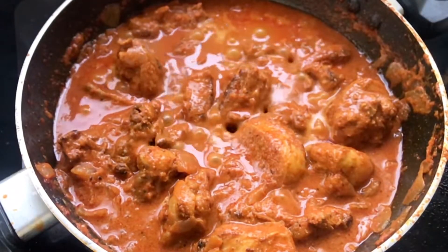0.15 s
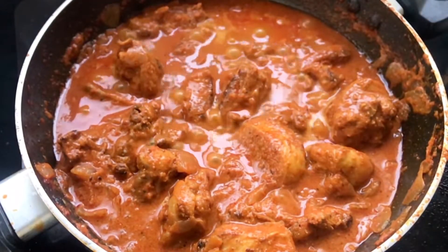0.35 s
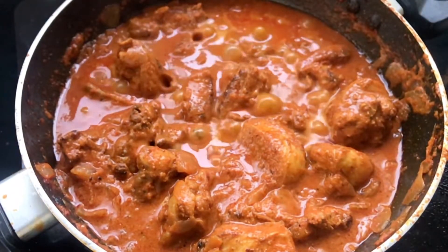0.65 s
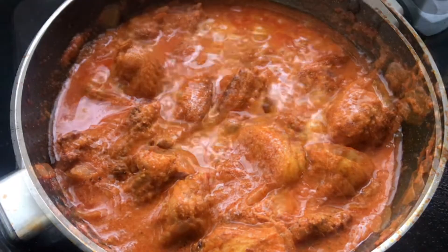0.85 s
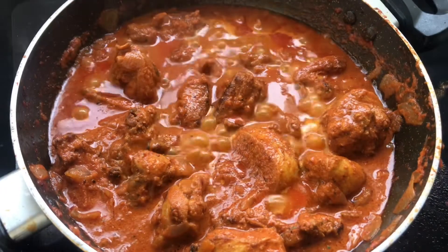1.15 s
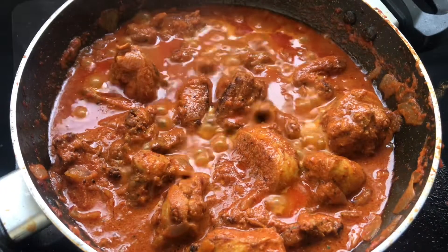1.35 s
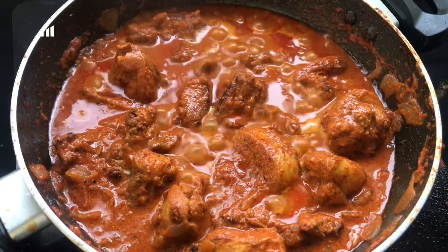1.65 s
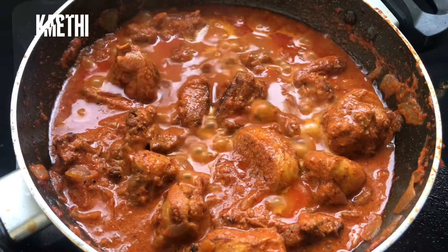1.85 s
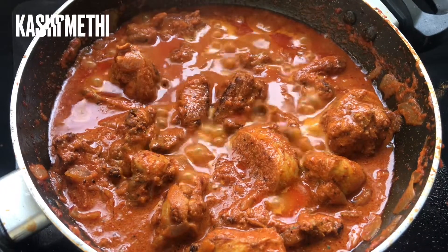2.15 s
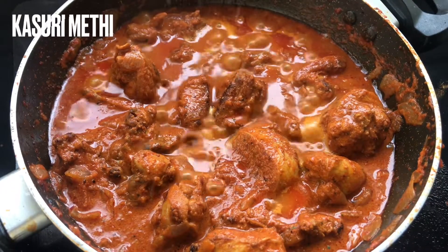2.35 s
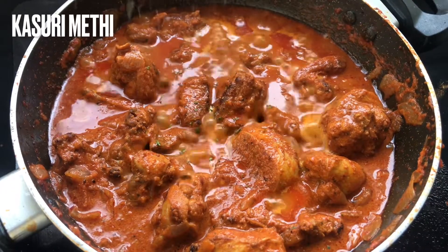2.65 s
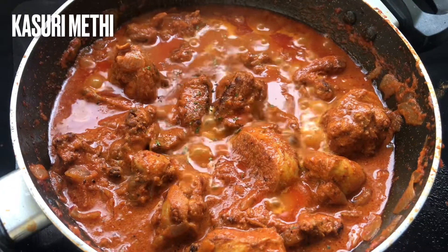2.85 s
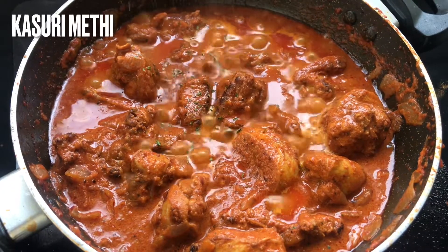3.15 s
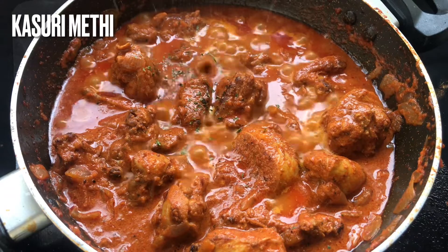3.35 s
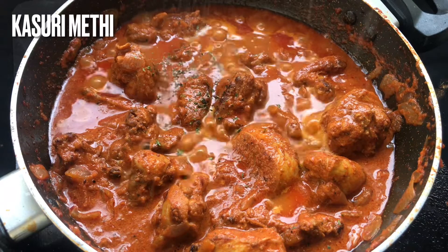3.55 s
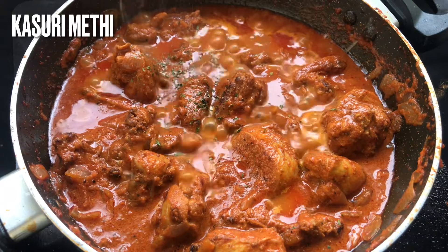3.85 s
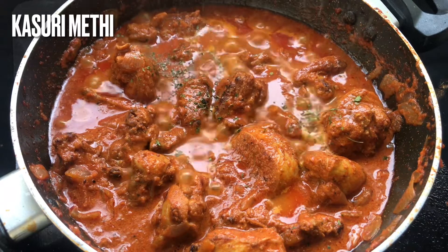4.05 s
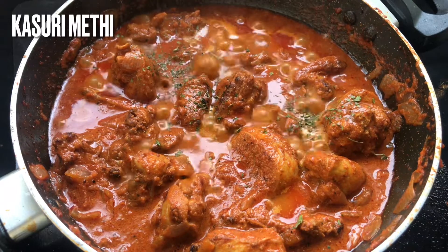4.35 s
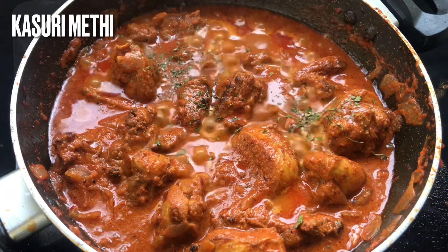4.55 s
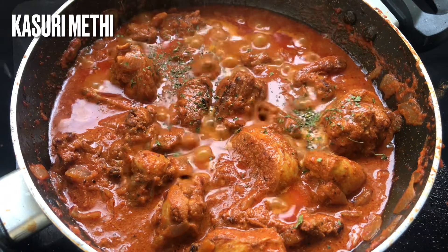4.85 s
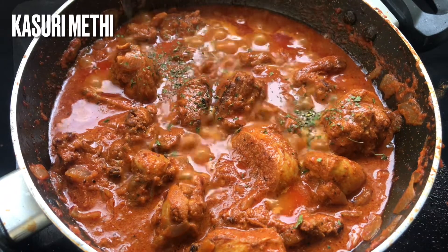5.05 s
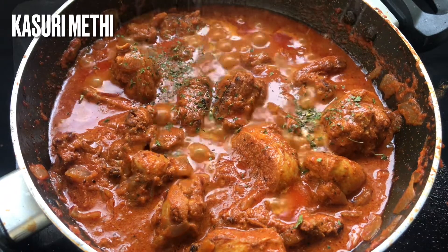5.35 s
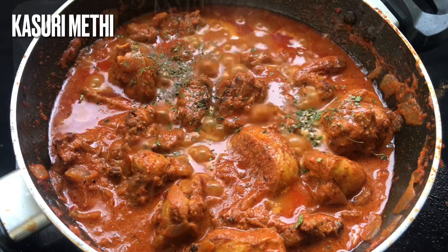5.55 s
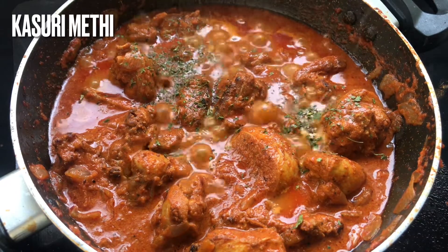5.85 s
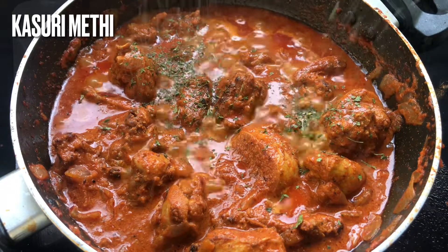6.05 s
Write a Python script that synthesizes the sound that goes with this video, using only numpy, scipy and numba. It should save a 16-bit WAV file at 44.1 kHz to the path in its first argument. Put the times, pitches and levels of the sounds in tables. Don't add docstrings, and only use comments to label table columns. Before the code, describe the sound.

Silence holds until about 0.6 s, then a small hard kitchen fades in, full by about 1.15 s. An extractor fan rushes softly with a steady low-mid singing tone above mains hum; a far engine idles unevenly through the walls. Very close, thick gravy simmers in a steel pan: bubbles thump, spit and spray in brief clusters of tiny wet clicks, with short rising plops, quiet gurgling and fine fizz. Each burst rings the pan and draws a short room reflection. A notably sharp snap cracks at 3.2 s, and others cluster near 4.77 s. The hob's faint, very high buzzing whine swells from 2.45 to 3.5 s, briefly from 4.7 to 5.1 s, and again from 5.4 s to the end. The engine drones lower around 3.5 to 3.8 s and barks hardest near 4 s. Simmering continues irregularly to the end, past 6 s.

```python
import sys
import numpy as np
from scipy import signal
from scipy.fft import rfft, irfft
from scipy.io import wavfile
from scipy.ndimage import uniform_filter1d
from numba import njit

SR = 44100
rng = np.random.default_rng(int(sys.argv[2]) if len(sys.argv) > 2 else 0)


def store_wav(level_fs):
    pcm = np.round(np.clip(np.atleast_2d(level_fs), -1, 1) * 32767)
    wavfile.write(sys.argv[1], SR, pcm.T.astype(np.int16))


def volts_from_decibels(level):
    exponent = np.asarray(level, float) / 20
    return 10 ** exponent


N = 272662


def level(x, db):
    return x * volts_from_decibels(db) / np.sqrt(np.mean(x ** 2))


def curve(table):
    s, *columns = np.transpose(table)
    return [np.interp(np.arange(N) / SR, s, c) for c in columns]


def band(x, hz, width):
    return signal.lfilter(*signal.iirpeak(hz, hz / width, fs=SR), x)


def walk(rate):
    hold = int(SR / rate)
    steps = np.repeat(rng.standard_normal(N // hold + 1), hold)
    return 0.74 * uniform_filter1d(uniform_filter1d(steps, hold), hold)[:N]


@njit
def grains(n, start, hz, cycles, size, glide):
    out = np.zeros(n)
    for g in range(len(start)):
        step = 2 * np.pi * hz[g]
        decay = np.exp(-hz[g] / cycles[g])
        a, closed, phase = size[g], 1., 0.
        for i in range(start[g], min(n, start[g] + int(6 * cycles[g] / hz[g]))):
            out[i] += a * (1 - closed) * np.sin(phase)
            phase += step
            step *= 1 + glide * hz[g] / cycles[g]
            a *= decay
            closed *= decay ** 4
    return out


def clicks(s, hz, cycles, db, glide=0.035):
    hz = np.clip(hz, 200, 15000)
    s, hz, cycles, db = (np.ravel(v) for v in np.broadcast_arrays(s, hz, cycles, db))
    return grains(N, (s * SR).astype(np.int64), hz / SR, 1. * cycles, volts_from_decibels(db), glide)


# (time [s], peak level [dB], fine spray level [dB])
BIG_THUMPS = [(0.957, -45.5, -15), (1.0418, -42.5, -27), (1.127, -51, -17), (1.2525, -45, -27),
              (1.356, -41, -15), (1.4642, -41.5, -14.5), (1.5564, -38, -18), (2.1175, -50, -15),
              (2.2247, -45, -13), (2.318, -42, -15), (2.4116, -49, -9.5), (2.497, -48, -8),
              (2.5333, -42.5, -19), (2.6085, -45, -26), (2.7795, -42, -13), (2.878, -51.5, -5),
              (2.9595, -46, -13), (3.379, -48, -14), (3.5, -45, -8.5), (3.6336, -47, -17),
              (3.7129, -45.5, -15), (3.9997, -46, -9.5), (4.0724, -42, -20), (4.1645, -43, -17.5),
              (4.349, -44, -17), (4.4325, -44, -21), (4.669, -40.5, -14.5), (4.7644, -37, -18.5),
              (5.1135, -42.5, -13), (5.7069, -47.5, -23)]
# (time [s], peak level [dB], fine spray level [dB], skin snap pitch [Hz])
TIGHT_SPITS = [(.8627, -48.5, -18, 5170), (.9822, -41, -20, 3750), (1.003, -59, -24, 4310),
               (1.5354, -56, -11, 4180), (1.623, -51, -15, 4440), (1.854, -41, -17, 3790),
               (1.8596, -45.5, -18, 3920), (1.937, -41.5, -17.5, 4030), (2.244, -41.5, -34, 3620),
               (2.3477, -38, -19.5, 3887), (2.6952, -48.5, -13, 5780), (2.8263, -43.5, -16, 3790),
               (3.0479, -46.5, -16, 8100), (3.1915, -45, -11, 5480), (3.2568, -47, -11, 4400),
               (3.5228, -54, -15, 11670), (3.5762, -51, -15, 5770), (3.593, -44.5, -25, 4305),
               (3.7906, -45.5, -12, 6000), (3.8951, -44, -14, 5550), (4.3862, -46.5, -12, 3980),
               (4.9364, -47.5, -11, 6070), (5.0059, -53, -21, 4090), (5.0307, -45.5, -19, 5770),
               (5.1756, -46, -18, 4110), (5.189, -46, -20, 3960), (5.2045, -43, -20, 6426),
               (5.3016, -38.5, -14.5, 7020), (5.4654, -46.5, -19, 5560), (6.091, -40.5, -18, 7630)]
# (time [s], peak level [dB], fine spray level [dB])
SOFT_SPRAYS = [(.688, -58, -21), (.785, -55.5, -16), (1.1834, -57.5, -4), (1.6407, -48, -18),
               (1.7209, -61, -16), (1.744, -50, -10), (2.0586, -48, -26), (2.2046, -56, -10),
               (2.4462, -56, -16), (2.4667, -53, -16), (3.1635, -47, -9), (3.472, -60, -4),
               (3.8595, -55, -32), (4.1353, -52, -30), (4.332, -49, -20), (4.4871, -50, -22),
               (4.514, -47, -19), (4.5709, -46, -19), (4.5855, -47.5, -22), (4.6434, -51, -17),
               (4.8622, -47, -18), (5.2804, -44, -22), (5.57, -54, -5.5), (5.614, -56, -9),
               (5.6766, -51, -12.5), (5.7885, -52, -9), (5.9098, -48.5, -12), (6.01, -52, -17),
               (6.056, -48, -13), (6.1517, -52, -14)]
SPRAY_LENGTHS = (.019, .015, .016)


def bursts(count=90):
    kinds = [np.array(k)[:, :3] for k in (BIG_THUMPS, TIGHT_SPITS, SOFT_SPRAYS)]
    s, db, fine_db = (c[:, None] for c in np.vstack(kinds).T)
    per_kind = (-4, -20, -10), (-4, -6, -5.5), SPRAY_LENGTHS
    sizes = [len(k) for k in kinds]
    ring_db, coarse_db, spray_s = (np.repeat(v, sizes)[:, None] for v in per_kind)
    chance = rng.random((len(s), 3, count))
    late, tune, size = chance[:, 0], chance[:, 1], chance[:, 2]
    blow_hz = PAN_MODES[0][0] * (1 + 0.11 * (tune[:, :1] - .5))
    blow = clicks(s, blow_hz, 10.3, db + ring_db + .1)
    small = (np.arange(count) + tune) / count
    late = 1.0 * late ** 1.6 + .95 * small - .55
    drop_hz = 1500 * 2 ** (3.35 * small)
    bright = np.clip(np.log2(drop_hz / 4000) / 1.36, 0, 1)
    spray_db = -45.0 + 0.75 * (db + 44.5) + 15.0 * np.minimum(late, 0)
    drop_db = spray_db + (1 - bright) * (coarse_db + 0.084) + bright * (fine_db + 11.5)
    drop_db = drop_db + 13.2 * (size ** 2.6 - .85) - 4.3 * size ** 3
    return blow + clicks(s + spray_s * late, drop_hz, 2.95 + 8.7 * size ** 3, drop_db, glide=0.031)


# (time [s], level [dB], pitch [Hz])
LONE_SNAPS = [(1.4675, -43, 6120), (2.539, -40, 3496), (2.7948, -51, 8486), (2.8895, -54, 3000),
              (3.1929, -31.5, 5500), (3.1959, -47, 5940), (3.4949, -44, 4040), (3.5804, -47, 7840),
              (3.934, -49, 4250), (4.0816, -42, 3014), (4.421, -49, 2840), (4.4425, -46, 3140),
              (4.7675, -43, 3296), (4.7685, -39, 5200), (3.1931, -42, 10510), (2.245, -50, 9500),
              (2.187, -54, 7500), (4.7696, -41, 8180), (4.853, -41, 2970), (4.9732, -44.5, 3620),
              (5.7098, -46, 6240)]


def snaps():
    lag_s = .002
    spits = [(s + lag_s, db + 1.5, hz) for s, db, _, hz in TIGHT_SPITS]
    thumps = [(s + lag_s, db - 10, 3290) for s, db, _ in BIG_THUMPS]
    s, db, hz = np.transpose(list(LONE_SNAPS) + spits + thumps)
    ring = clicks(s, hz, 1.94, db + 3.5)
    tick = clicks(s, 1.57 * hz, 1.0, db - 5.0)
    return ring + tick


# (time [s], peak level [dB], pitch [Hz])
SLOW_PLOPS = [(0.81, -51, 2240), (0.935, -54, 2310), (1.024, -40, 596), (1.165, -44, 2150),
              (1.191, -38, 804), (1.342, -52, 2020), (1.463, -50, 2580), (1.551, -48, 2580),
              (1.85, -47, 1880), (2.315, -40, 1670), (2.348, -52, 2232), (2.518, -40, 1410),
              (2.611, -42, 1470), (2.776, -53, 2580), (2.876, -49, 2527), (2.876, -44, 1676),
              (3.525, -49, 2200), (3.711, -40, 1340), (3.808, -48, 2380), (4.079, -37, 794),
              (4.082, -37, 1366), (4.535, -45, 1866), (4.764, -41.5, 1476), (4.835, -48, 2140),
              (4.876, -49, 1880), (5.002, -41.5, 1620), (5.204, -38, 788), (5.206, -45, 1780),
              (5.625, -37.5, 1294), (6.114, -52, 2465)]


def plops(ring_s=0.0041):
    s, db, hz = np.transpose(SLOW_PLOPS)
    return clicks(s, .97 * hz, ring_s * hz, db + 5.0, glide=0.044)


def gurgle(count=300):
    when, tune, size = rng.random((count, 3)).T
    hz = 600 * 2 ** (1.8 * tune)
    db = -47.0 - 5.8 * np.log2(hz / 1000) - 2.9 * np.log(1 - .95 * size)
    return clicks(when * N / SR, hz, .005 * hz, db, glide=0.059)


def fizz(count=4000):
    when, tune, size, ring = rng.random((count, 4)).T
    hz = 700 * 2 ** (4.3 * tune)
    db = -57.0 - 4.9 * np.log2(hz / 2000) - 4.5 * ring - 3.4 * np.log(1 - .98 * size)
    return clicks(when * N / SR, hz, 0.67 + 6.0 * ring, db)


# (frequency [Hz], width [Hz], level [dB])
PAN_MODES = [
    (2840, 38, -1),
    (4130, 250, -29),
    (5680, 470, -12),
    (6440, 530, -13),
    (8270, 40, 13),
    (8660, 350, -10),
    (11250, 110, -10),
]
# (delay [s], level [dB])
WALL_ECHOES = [
    (.0008, -16.5),
    (.0013, -16.5),
    (.0029, -7),
]


def pan(x):
    x = x + sum(volts_from_decibels(db) * np.pad(x, (int(s * SR), 0))[:N] for s, db in WALL_ECHOES)
    modes = sum(volts_from_decibels(0.19 * db) * band(x, hz, 2.9 * width) for hz, width, db in PAN_MODES)
    return x + volts_from_decibels(-3.0) * modes


def room(x, count=3):
    t60_s, lag_s = .28, .010
    t = np.arange(SR // 2) / SR
    spot = np.cumsum(rng.random(N // 2000 + 1)).repeat(2000)[:N] * np.pi
    out = x
    for k in range(count):
        noise = rng.standard_normal(len(t))
        low = signal.lfilter([.5], [1, -.5], noise)
        tail = low * volts_from_decibels(-60 * t / t60_s)
        tail += 1.6 * (noise - low) * volts_from_decibels(-60 * t / (.8 * t60_s))
        tail *= np.clip(t / lag_s, 0, 1) ** 3
        tail /= np.sqrt(np.sum(tail ** 2))
        share = uniform_filter1d(np.cos(spot + k * np.pi / count), 100) * np.sqrt(2 / count)
        out = out + volts_from_decibels(-5) * signal.fftconvolve(x * share, tail)[:N]
    return out


# (frequency [Hz], density [dB per Hz])
FAN_RUSH = [(25, -11), (60, -1), (100, 0.5), (170, -4), (320, -2.5), (520, -3), (980, -3.5), (1500, -8.5),
            (2000, -16.5), (3300, -23), (6300, -29.5), (9500, -34.5), (12500, -35), (15800, -30)]
# (frequency [Hz], width [Hz], boost [dB])
ROOM_MODES = [(215, 30, 2.5), (275, 15, 1.5), (561, 20, 2), (605, 38, 0), (700, 50, 0.5), (900, 11.4, 7),
              (977, 36, 4.5), (1121, 25, 3), (1200, 36, 1.5), (1166, 37, 1.5), (1410, 120, 2.5),
              (1620, 46, 2.0), (1700, 25, 2.5), (1765, 25, 7.5), (1900, 21, 3.5), (2570, 35, 6.5)]


def rush():
    hz = np.arange(N // 2 + 1) * SR / N + 1e-3
    octave = np.log2(hz)
    rush_hz, rush_db = np.transpose(FAN_RUSH)
    air = rfft(rng.standard_normal(N)) * volts_from_decibels(np.interp(octave, np.log2(rush_hz), rush_db))
    air *= np.clip(hz / 25, 0, 1) ** 2
    air *= 1 + sum((volts_from_decibels(db) - 1) / (1 + (2 * (hz - f) / width) ** 2) for f, width, db in ROOM_MODES)
    flow = 0
    for centre in range(3, 16):
        part = irfft(air * np.clip(1 - abs(octave - centre), 0, 1), N)
        flow = flow + part * volts_from_decibels(0.97 * walk(2.97) + 1.43 * walk(15))
    return level(flow, -43)


# (frequency [Hz], level [dB], wobble [dB])
STEADY_TONES = [
    (386.8, -42.5, 1.5),
    (99.85, -48, 1.5),
    (481.7, -63, 4),
]


def tones():
    t = np.arange(N) / SR
    drift = np.cumsum(0.24 * walk(1.49)) / SR
    return sum(np.sqrt(2) * volts_from_decibels(db + wobble_db * walk(6)) * np.sin(2 * np.pi * (hz * t + drift * hz / 387))
               for hz, db, wobble_db in STEADY_TONES)


# (frequency [Hz], level [dB])
COIL_PARTIALS = [
    (14080, -5),
    (14220, -5),
    (14330, 2),
    (14460, -1),
    (14590, -1.5),
    (14800, -11),
    (13930, -7),
]
# (start [s], cut [s], rise [dB])
POWER_SURGES = [
    (2.45, 3.5, 3),
    (4.7, 5.1, 2),
    (5.399, 6.3, 3),
]


def whine():
    t = np.arange(N) / SR
    mains = np.cos(2 * np.pi * 100 * t)
    noise = rng.standard_normal(N)
    sing = 0.45 * band(band(noise, 14450., 900.), 14450., 900.)
    sing = sing + sum(1.5 * volts_from_decibels(db + 4.5 * walk(12)) * band(noise, hz, 35.) for hz, db in COIL_PARTIALS)
    rise_s, fall_s = .3, .05
    surge_db = sum(db * np.clip((t - start) / rise_s, 0, 1) * np.clip((cut - t) / fall_s + 1, 0, 1)
                   for start, cut, db in POWER_SURGES)
    return level(sing * volts_from_decibels(3.8 * mains + 2.0 * walk(9)), -67.5) * volts_from_decibels(surge_db)


# (time [s], firing cycle [Hz], level [dB], bark of the high multiples [dB])
FAR_ENGINE = [(.62, 16.6, -56, -10), (1.0, 17.8, -57, -7), (1.5, 16.4, -52.5, -14), (1.85, 15, -62, -8),
              (2.37, 15.6, -54, -6), (2.6, 14.3, -57, -4), (3.08, 14.6, -47, -15), (3.28, 15.4, -52, 0.5),
              (3.5, 15.2, -43, -14), (3.8, 15.6, -43, -6), (4.01, 16.3, -54, 5), (4.3, 15, -52, -3),
              (4.6, 15.4, -52, -3), (5.0, 15.7, -66, 0), (5.25, 16.3, -51.5, -2), (5.55, 16.1, -46, -12.5),
              (5.8, 15.2, -56, -3), (6.18, 17, -57, -3)]
FIRING_ORDERS = (4, 5, 8, 9)
FIRING_ORDER_DB = (-59.5, 0.5, -6.5, 0.5)


def engine():
    hz, db, bark_db = curve(FAR_ENGINE)
    phase = 2 * np.pi * np.cumsum(hz) / SR
    motion = [4.6 * walk(4.4), db, db + bark_db + 4.0 * walk(4.35), db + bark_db]
    dbs = np.array(FIRING_ORDER_DB)[:, None] + motion
    lines = sum(volts_from_decibels(d + 1.7 * walk(12.0)) * np.sin(k * phase + k ** 2) for k, d in zip(FIRING_ORDERS, dbs))
    faint = sum(volts_from_decibels(dbs[-1] - 11.0 + 1.5 * walk(3.1)) * np.sin(k * phase + k ** 2)
                for k in (6.5, 7.5, 11, 12, 13))
    return np.sqrt(2) * (lines + faint)


# (time [s], gain [0-1])
FADE_IN = [
    (.612, 0.0),
    (.64, 0.05),
    (.8, 0.35),
    (.95, 0.56),
    (1.06, 0.85),
    (1.15, 0.86),
]


def scene():
    fade = curve(FADE_IN)[0]
    struck = pan(snaps() + bursts() + fade * fizz())
    sauce = room(struck + plops() + fade * gurgle())
    background = rush() + tones() + whine() + engine()
    return (sauce + fade * background)[None]


def roll_off(x):
    return signal.sosfilt(signal.butter(12, 16130, fs=SR, output="sos"), x)


def record(dry):
    heard = dry - 0.36 * band(dry, 10520, 530)
    top_cut = signal.ellip(16, .2, 90, 15745, fs=SR, output="sos")
    mix = signal.sosfilt(top_cut, heard)
    return roll_off(mix)


dry = scene()
out = record(dry)
store_wav(out)
```